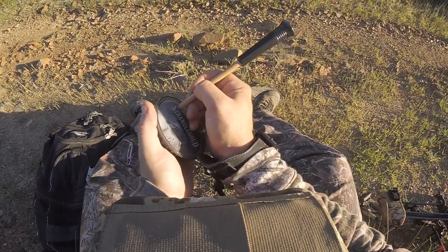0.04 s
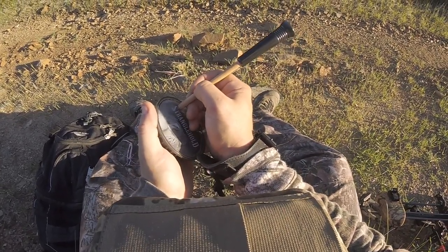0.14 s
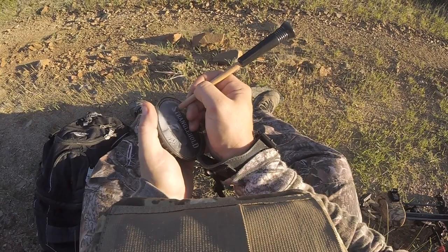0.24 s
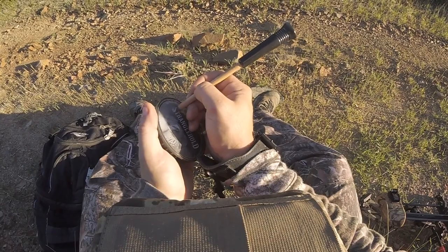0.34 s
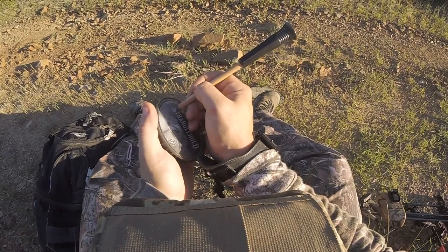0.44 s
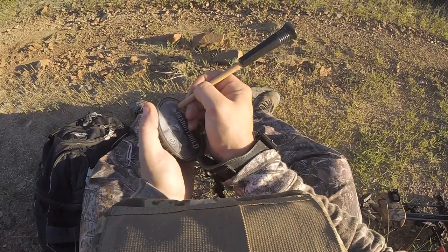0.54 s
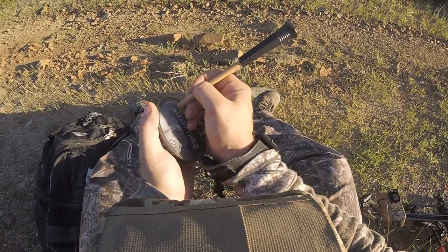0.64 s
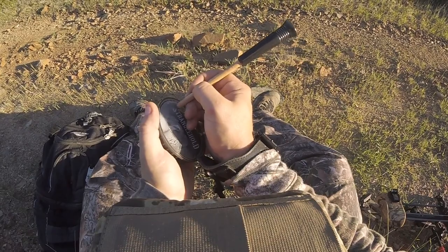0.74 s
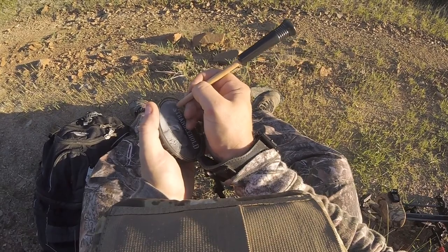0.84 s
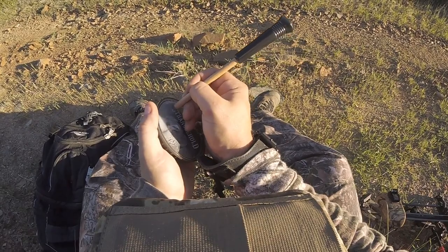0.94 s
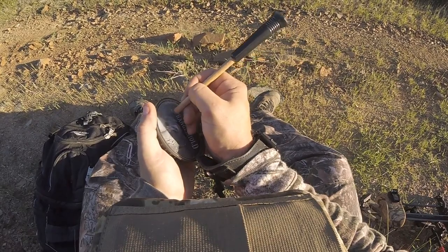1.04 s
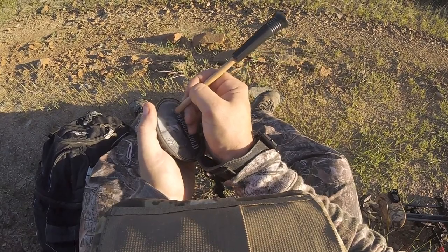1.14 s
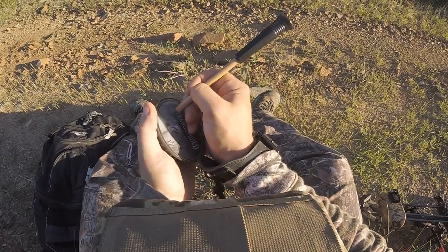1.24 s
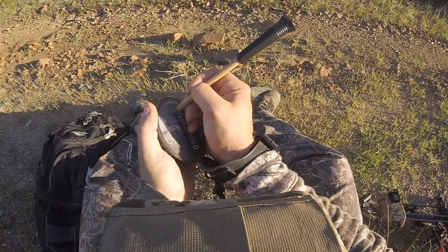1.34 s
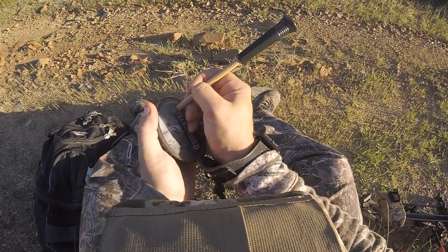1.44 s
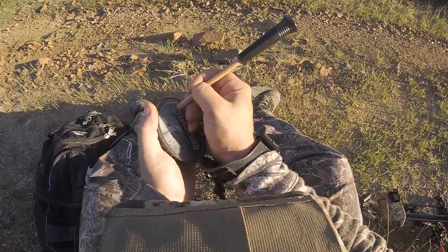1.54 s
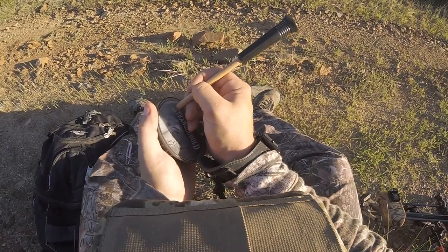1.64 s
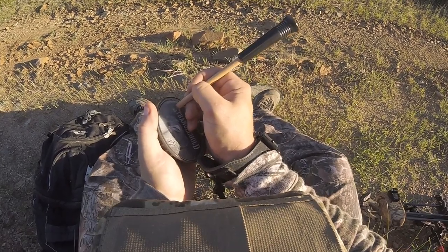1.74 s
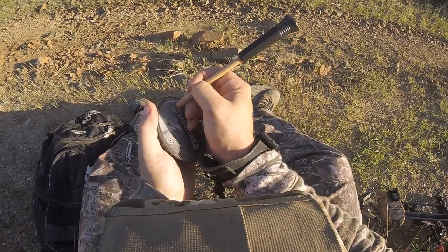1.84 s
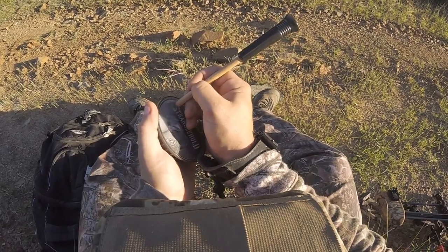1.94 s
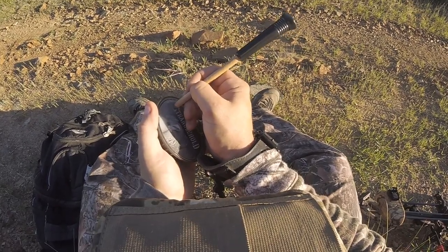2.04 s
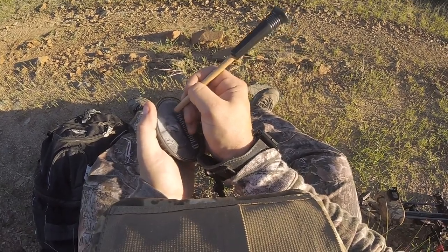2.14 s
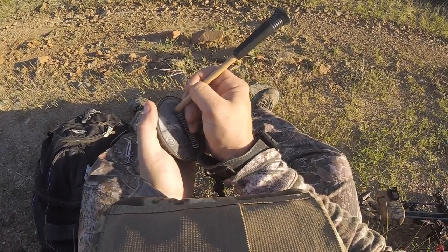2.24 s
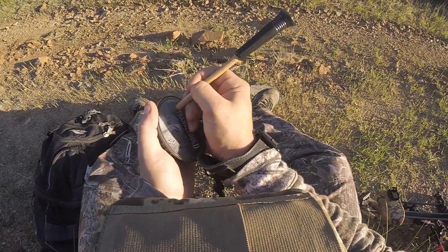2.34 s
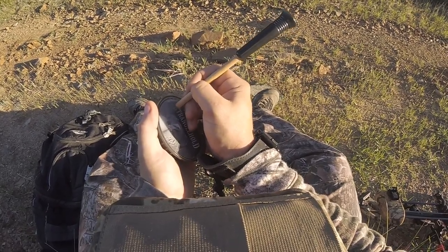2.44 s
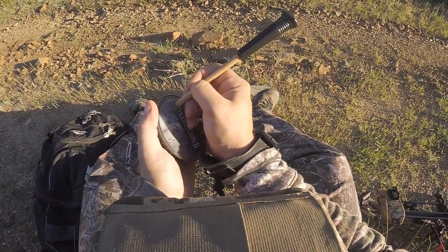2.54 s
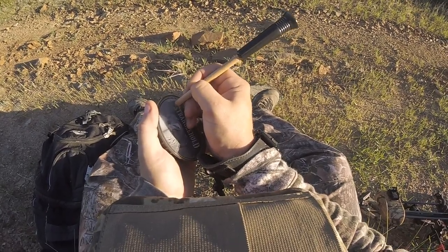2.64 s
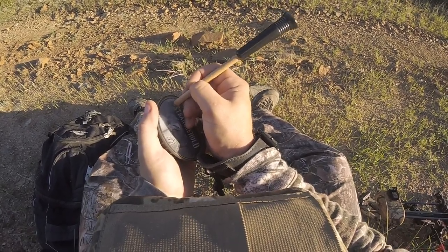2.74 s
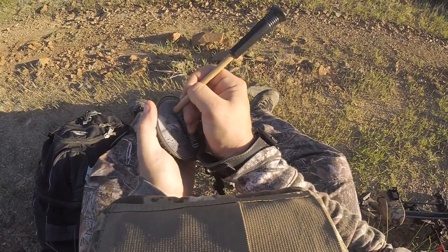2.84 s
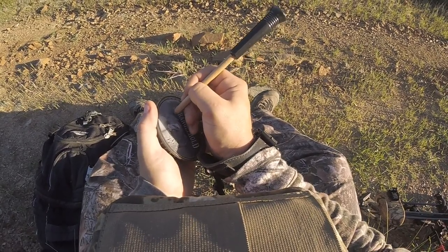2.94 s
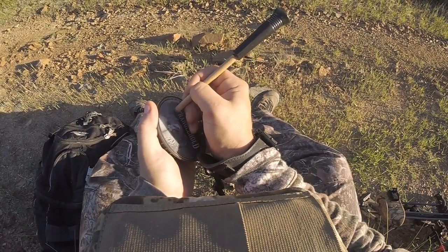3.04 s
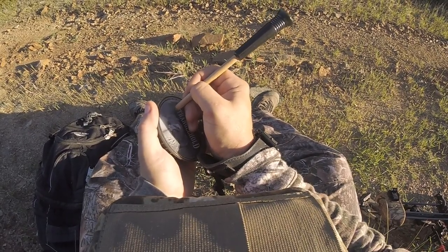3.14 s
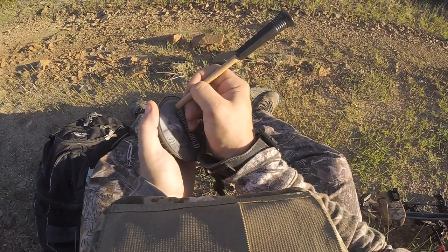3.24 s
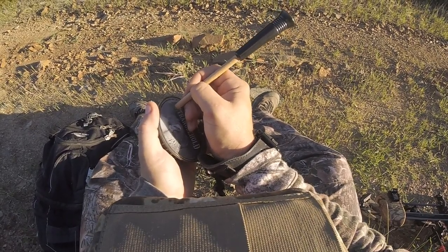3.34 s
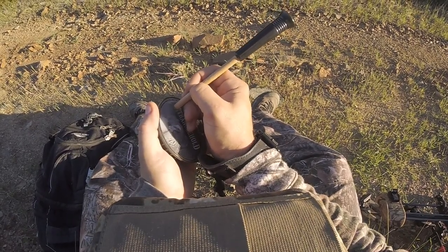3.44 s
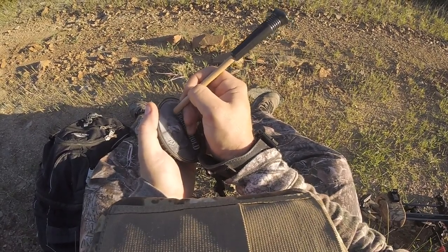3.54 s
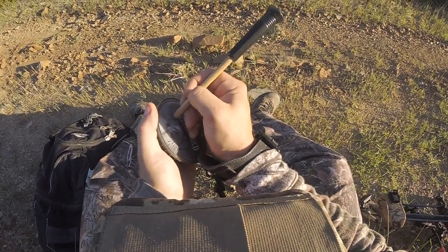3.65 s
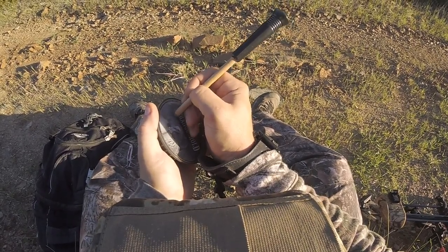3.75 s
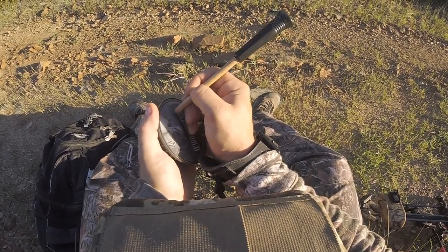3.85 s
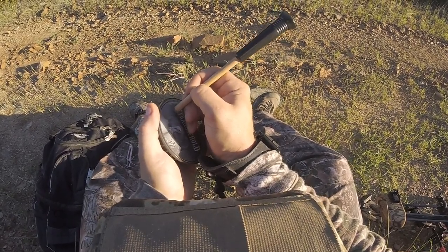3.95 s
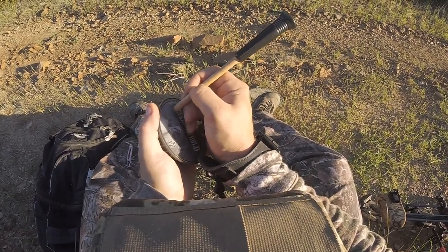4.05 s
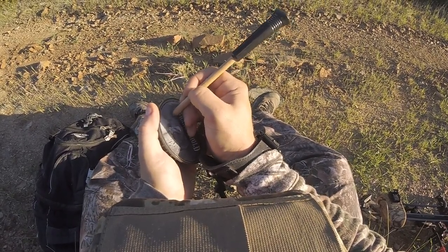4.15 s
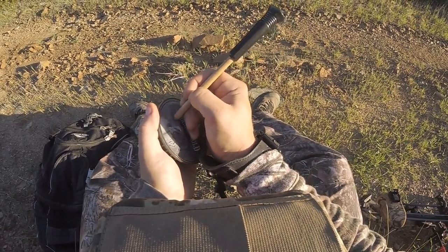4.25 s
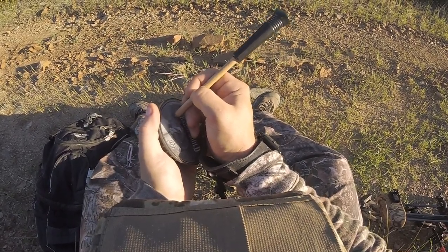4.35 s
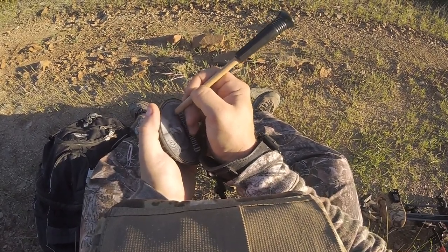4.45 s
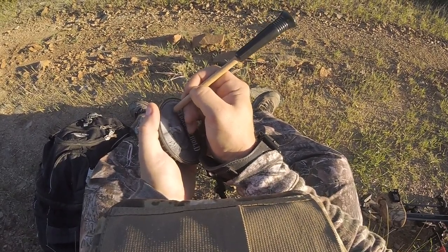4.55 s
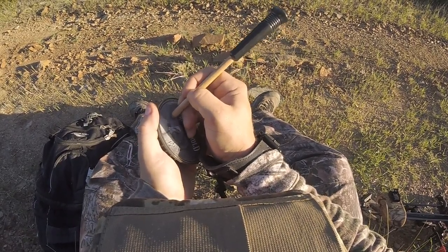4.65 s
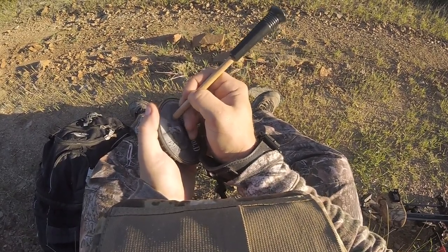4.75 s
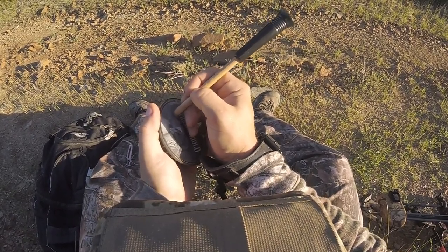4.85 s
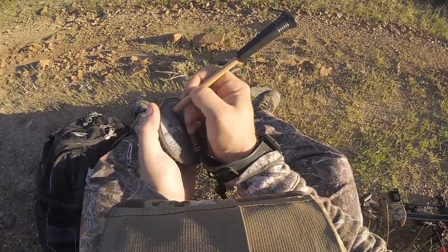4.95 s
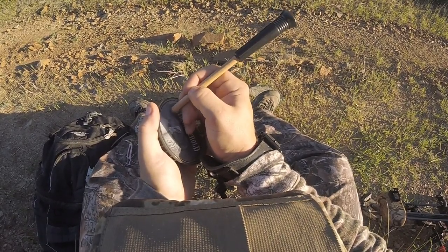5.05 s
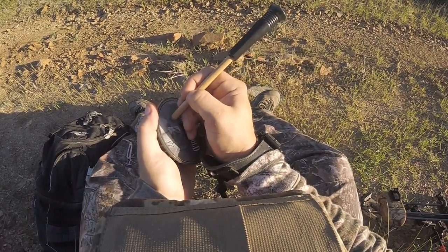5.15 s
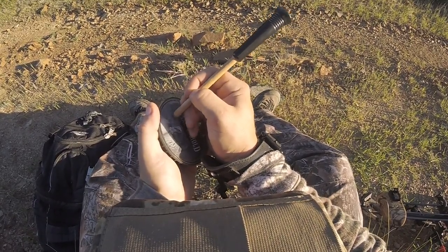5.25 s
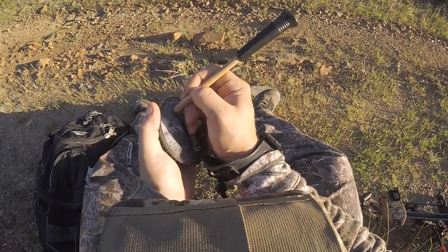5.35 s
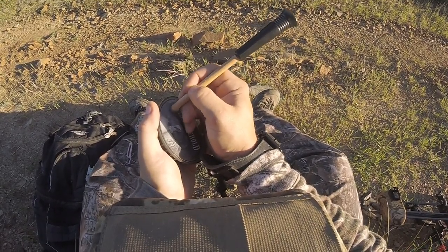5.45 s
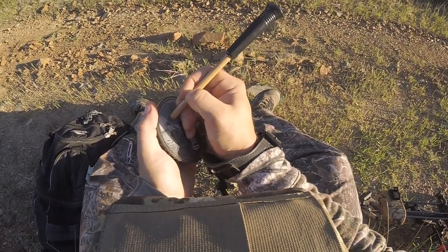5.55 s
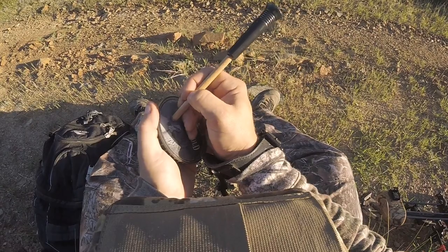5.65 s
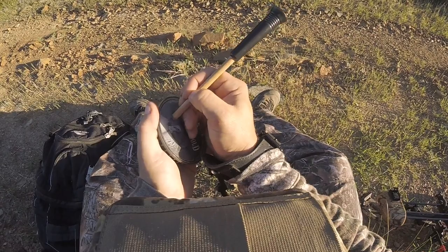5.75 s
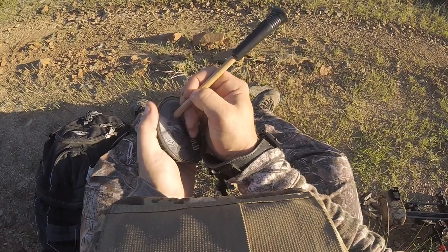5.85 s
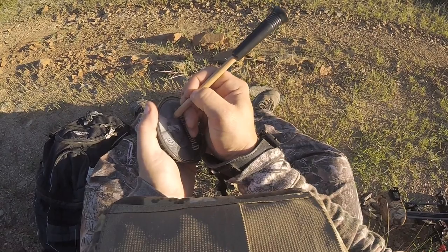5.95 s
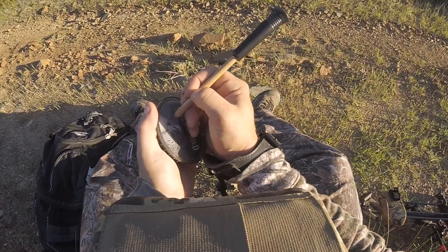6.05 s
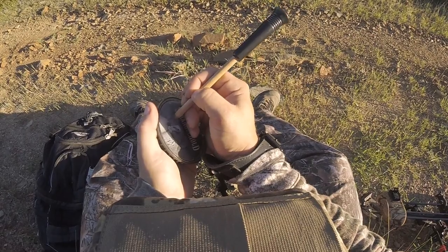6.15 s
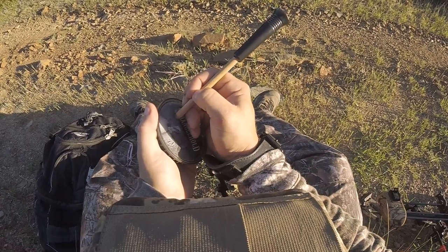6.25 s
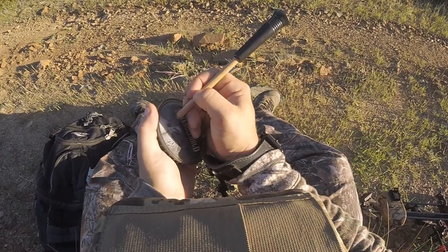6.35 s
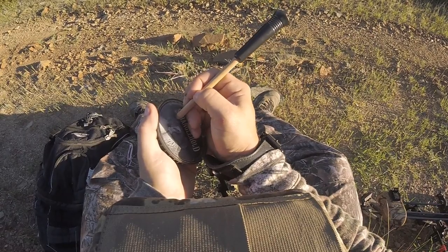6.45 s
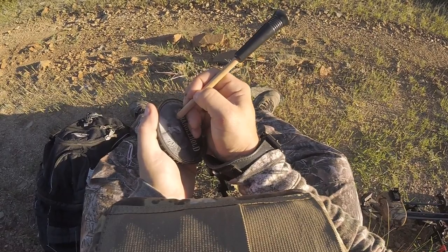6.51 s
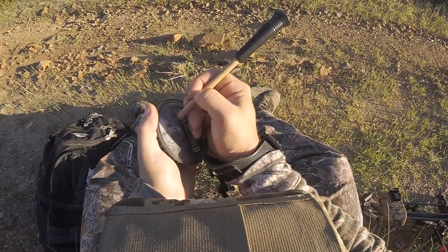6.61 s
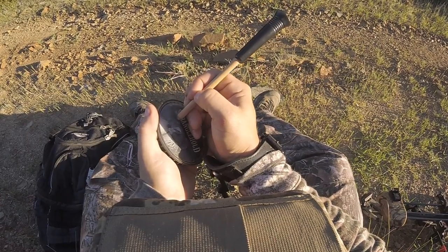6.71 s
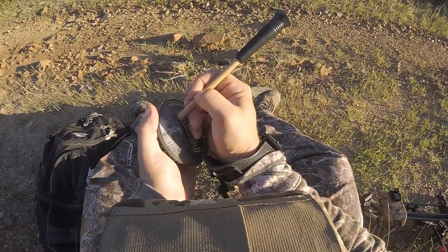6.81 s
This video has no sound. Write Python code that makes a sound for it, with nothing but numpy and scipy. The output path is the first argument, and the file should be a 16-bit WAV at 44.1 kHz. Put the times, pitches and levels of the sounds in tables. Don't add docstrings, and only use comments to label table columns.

```python
import sys
import numpy as np
from scipy import signal
from scipy.fft import rfft, irfft, next_fast_len
from scipy.io import wavfile
from scipy.ndimage import uniform_filter1d

SR = 44100
rng = np.random.default_rng(int(sys.argv[2]) if len(sys.argv) > 2 else 0)


def int16_out(signal):
    q = np.round(np.clip(np.atleast_2d(signal).T, -1, 1) * 32767)
    wavfile.write(sys.argv[1], SR, q.astype(np.int16))


def natural_amplitude(level_db):
    exponent = np.asarray(level_db, float) / 20
    return 10 ** exponent


N = 303408
DUCK_DEPTH_DB = 7

# bite_s, break_s, lift_s, bite_slip_hz, lift_slip_hz
YELPS = [
    (.899, .9815, 1.088, 950, 786),
    (2.0855, 2.0955, 2.204, 900, 840),
    (2.803, 2.804, 2.9, 845, 726),
    (3.508, 3.5315, 3.62, 922, 720),
    (4.1145, 4.125, 4.194, 903, 740),
    (4.629, 4.636, 4.7, 907, 804),
    (5.0875, 5.098, 5.154, 882, 720),
    (5.509, 5.51, 5.572, 845, 740),
]
# creep_before_bite_s, release_after_lift_s, lift_level_db, slide_after_lift_db
HAND = [(0.02, .016, -15, -54), (0.0062, 0.0063, -14, -56), (0.0072, .011, -14.5, -46),
        (.02, .015, -11.5, -40.5), (.012, .008, -15, -38), (.02, .008, -16.5, -40), (0.014, .01, -10, -40),
        (.008, 0.0116, -11.5, -36.5)]
# pitch_hz, width_hz, level_db
POT = [(1358.3, 200, 2.5), (1670, 267, 5), (1851, 130, -8)]
# pitch_hz, width_hz, level_db
OVERTONES = [(2508, 200, -23.5), (2658, 390, -31.5), (3000, 140, -39), (3570, 130, -29), (4120, 340, -44.5),
             (4700, 170, -44.5), (5155, 530, -29), (5840, 140, -29), (6360, 340, -42), (7480, 320, -52.5),
             (8340, 170, -38.5), (9150, 360, -50), (10264, 600, -54.5), (10700, 150, -50.5),
             (12380, 1200, -62)]


def resonance(x, hz, width_hz):
    r = np.exp(-np.pi * width_hz / SR)
    b = np.array([1, 0, -1]) * (1 - r * r) / 2
    a = [1, -2 * r * np.cos(2 * np.pi * hz / SR), r * r]
    return signal.lfilter(b, a, x + 1e-18)


def rms_one(x):
    return x / np.sqrt(np.mean(x ** 2))


def drift(rate_hz):
    r = np.exp(-2 * np.pi * rate_hz / SR)
    wander = signal.lfilter([1], [1, -2 * r, r * r], rng.standard_normal(N + SR))
    return rms_one(wander[SR:])


def gusts_db():
    # peak_s, swell_db
    gusts = [
        (.8, 11.5),
        (1.17, 12),
        (1.72, 11),
        (2.1, 7.5),
        (3.07, 4),
        (4.08, 2.5),
    ]
    wind_db, gust_s = -78.5, 0.1
    t = np.arange(N) / SR
    return wind_db + sum(swell_db * np.exp(-.5 * ((t - s) / gust_s) ** 2) for s, swell_db in gusts)


def air():
    # pitch_hz, density_db_per_hz
    air_spectrum = [(18, -57.5), (30, -30), (102, -40), (133, -3.5), (187, -1), (359, -11.5), (388, -11.5),
                    (1020, -19.5), (1680, -24.5), (2680, -29), (4080, -39), (5160, -42.5), (6700, -28.5),
                    (8930, -30), (15400, -45)]
    level_db, rise_db = -51.5, 1.03
    hz = np.maximum(np.arange(N // 2 + 1) * SR / N, 1)
    point_hz, point_db = np.transpose(air_spectrum)
    shape_db = np.interp(np.log(hz), np.log(point_hz), point_db)
    noise = rms_one(irfft(rfft(rng.standard_normal(N)) * natural_amplitude(shape_db), N))
    hum = rms_one(resonance(resonance(rng.standard_normal(N), 160, 20), 160, 20))
    hum = hum * natural_amplitude(-57.5 + 1.1 * drift(1.5))
    low_band = signal.butter(2, [18, 55], "band", fs=SR, output="sos")
    wind = rms_one(signal.sosfilt(low_band, rng.standard_normal(N)))
    noise_db = level_db + rise_db * np.linspace(-.5, .5, N) + 0.36 * drift(0.43)
    return natural_amplitude(noise_db) * noise + hum + wind * natural_amplitude(gusts_db() + 3.0 * drift(8))


def ringing(force, modes):
    return sum(natural_amplitude(level_db) * resonance(resonance(force, hz, width_hz), hz, width_hz)
               for hz, width_hz, level_db in modes)


def loud_band(x):
    return signal.sosfilt(signal.butter(4, [1200, 2110], "band", fs=SR, output="sos"), x)


def pot(force, rasp):
    return loud_band(ringing(force, POT)) + ringing(force + rasp, OVERTONES)


def taps():
    # at_s, peak_db, thump_db
    knock_table = [
        (0.164, -34.5, -58),
        (0.4619, -19.5, -47),
        (0.8165, -48, -47),
        (4.5875, -34.5, -61),
        (4.728, -22.5, -78),
        (4.9252, -34.5, -58),
        (5.3963, -50, -58),
        (5.447, -37, -26),
        (5.5914, -40, -46),
    ]
    knocks, thumps = np.zeros((2, N))
    for s, peak_db, thump_db in knock_table:
        knocks[round(s * SR)] = natural_amplitude(peak_db + 29.5)
        thumps[round(s * SR)] = natural_amplitude(thump_db + 27.5)
    tick = natural_amplitude(-37) * resonance(thumps, 6000, 7000)
    soft = signal.butter(1, 2500, fs=SR, output="sos")
    knocks, thumps = signal.sosfilt(soft, [knocks, thumps])
    thump = resonance(resonance(thumps, 260, 300), 280, 900)
    return tick + pot(knocks, 0) + 0.13 * loud_band(knocks) + thump


def sliding(t):
    # start_s, end_s, first_db, last_db
    slides = [(0.487, 0.523, -66, -64), (.58, 0.618, -67, -56), (0.67, 0.749, -58.5, -59.5),
              (1.117, 1.385, -54.5, -69), (1.42, 1.444, -64, -60), (1.471, 1.898, -73, -72),
              (1.901, 2.06, -70.5, -56), (2.231, 2.539, -53.5, -63), (2.546, 2.64, -67, -61.5),
              (2.662, 2.79, -68.5, -51.5), (2.964, 3.348, -56.5, -65.5), (3.411, 3.481, -61.5, -61.5),
              (3.741, 4.043, -49.5, -63), (4.296, 4.562, -53.5, -59), (4.807, 4.964, -51, -53),
              (4.98, 5.06, -58.5, -55), (5.26, 5.485, -53.5, -54), (5.604, 5.643, -55, -45.5),
              (5.67, 5.852, -59.5, -77.5)]
    # at_s, brightness_db
    drying = [
        (3.9, -1),
        (4.3, 3.5),
    ]
    settle_db_s, lean_db, lean_db_s = 286, -46, 496
    edge_s = .012
    power = np.zeros(N)
    for start_s, end_s, first_db, last_db in slides:
        edge = np.clip(np.minimum(t - start_s, end_s - t) / edge_s + 1, 0, 1)
        gain = natural_amplitude(np.interp(t, [start_s, end_s], [first_db, last_db]))
        power = np.maximum(power, (gain * edge) ** 2)
    back = power.copy()
    for (bite_s, _, lift_s, *_), (creep_s, release_s, _, after_db) in zip(YELPS, HAND):
        touch_s, free_s = bite_s - creep_s, lift_s + release_s
        lean = natural_amplitude(lean_db - lean_db_s * abs(touch_s - t))
        settle = natural_amplitude(after_db - settle_db_s * abs(t - free_s - .008))
        power += np.where(t < touch_s, lean, settle) ** 2
        power *= np.clip(np.maximum(touch_s - t, t - free_s + .004) / edge_s, 0, 1) ** 2
    bright_db = np.interp(t, *np.transpose(drying)) * np.minimum(back / (power + 1e-12), 1)
    return np.sqrt(power), natural_amplitude(bright_db)


def scrape():
    grains_per_s = 5000
    gain, bright = sliding(np.arange(N) / SR)
    grains = natural_amplitude(4.0 * np.minimum(rng.exponential(1, N), 5)) * rng.choice([-1, 1], N)
    grains = grains * (rng.random(N) < grains_per_s / SR)
    hiss = resonance(resonance(grains, 3000, 900), 3000, 900)
    high_whistle = natural_amplitude(2) * resonance(resonance(grains, 5250, 160), 5250, 160)
    low_whistle = natural_amplitude(4) * resonance(resonance(grains, 3560, 140), 3560, 140)
    tip = hiss + high_whistle + low_whistle
    treble = signal.sosfilt(signal.butter(2, 2200, "high", fs=SR, output="sos"), grains)
    sound = rms_one(natural_amplitude(-26) * bright * tip + pot(grains, 1.6 * bright * treble))
    return gain * natural_amplitude(2.5 * drift(30)) * sound


def notes():
    # at_s, top_hz, dip_hz, fall_db, hook_db
    trill = [(.6, 5600, 4800, -87, -71), (.8, 6050, 4620, -69, -62), (.9, 6050, 4620, -60, -55),
             (1.26, 6120, 4600, -59, -55), (1.34, 6150, 4420, -57, -59), (1.62, 5800, 4130, -54.5, -53),
             (1.78, 5600, 3820, -52.5, -56), (2.18, 5300, 3680, -57, -60), (2.35, 5250, 3620, -67, -68)]
    first_s, gap_s, tiring_s, hook_rise_hz = .6, .0715, .0019, 530
    k = np.arange(25)
    s = first_s + gap_s * k + tiring_s * np.maximum(k - 20, 0) ** 2
    at_s, *courses = np.transpose(trill)
    top_hz, dip_hz, fall_db, hook_db = [np.interp(s, at_s, course) for course in courses]
    chance = rng.standard_normal((len(k), 4)).T
    return zip(s, top_hz * (1 + .012 * chance[0]), dip_hz * (1 + .02 * chance[1]), dip_hz + hook_rise_hz,
               fall_db + 1.8 * chance[2], hook_db + 1.8 * chance[3])


def bird():
    # start_s, from_hz, to_hz, level_db
    chips = [
        (.522, 5060, 4700, -63),
        (6.18, 3430, 3300, -60.5),
        (6.55, 3470, 3300, -61),
    ]
    falters = [11, 12, 14, 15]
    falter_db = 18
    out = np.zeros(N)
    t = np.arange(round(.052 * SR)) / SR
    for k, (s, top_hz, dip_hz, hook_hz, fall_db, hook_db) in enumerate(notes()):
        gap_db = falter_db * (k in falters)
        hz = np.interp(t, [0, .004, .023, .034, .046], [top_hz, top_hz * .98, dip_hz, hook_hz, hook_hz * .94])
        level_db = np.interp(t, [0, .004, .013, .021, .030, .042, .052],
                             [fall_db - 14.0, fall_db - 0.5, fall_db - 3.5 - gap_db / 2,
                              hook_db - 9.5 - gap_db / 3, hook_db, hook_db - 0.5, hook_db - 31])
        out[round(s * SR):][:len(t)] += natural_amplitude(level_db) * np.sin(2 * np.pi * np.cumsum(hz) / SR)
    for s, from_hz, to_hz, level_db in chips:
        hz = np.linspace(from_hz, to_hz, 400)
        chip = np.hanning(len(hz)) * np.sin(2 * np.pi * np.cumsum(hz) / SR)
        out[round(s * SR):][:len(hz)] += natural_amplitude(level_db) * chip
    out = out + 2.5 * resonance(out, 5100, 200) + 2.5 * resonance(out, 5760, 200)
    lag_s = np.arange(round(.12 * SR)) / SR
    smear = rng.standard_normal(len(lag_s)) * natural_amplitude(-33 - 60 * lag_s / 0.24)
    return out + signal.fftconvolve(out, smear)[:N]


def stroke(bite_s, break_s, lift_s, bite_hz, lift_hz, creep_s, release_s, lift_db,
           ragged, alternate_s, alternate, late):
    # at_s, half_length_s, loss_db
    stumbles = [(0.9198, 0.0055, 8.5), (0.9835, .003, 3), (1.066, .006, 4.5), (1.0827, .005, 7),
                (2.094, 0.0053, 1.5), (4.188, 0.004, 16.5), (4.6739, .0025, 9), (4.6776, .0025, 6.5),
                (4.684, .005, 5.5), (5.548, .003, 4), (5.566, .003, 5.5)]
    # at_s, slips_lost_hz
    sag = [
        (2.812, 0),
        (2.838, 48),
        (2.853, 241),
        (2.862, 239),
        (2.873, 182),
        (2.879, 0),
    ]
    break_hz, lock_hz, creep_rise_hz, lift_rise_hz = 845, 670, 100, 95
    touch_db, bite_db, peak_db, broken_db, hold_db, gone_db = -44.5, -10, -7, -11.5, -9.5, -41
    broken_s = break_s + .0035
    recovered_s = broken_s + 0.015
    clean, locked_uneven, wear_power, chatter = .01, .022, 2.4, .45
    marks = [bite_s - creep_s, bite_s, break_s, broken_s, recovered_s, (break_s + lift_s) / 2 + .01,
             lift_s, lift_s + release_s]
    t = np.arange(marks[0], marks[-1], 1 / 2000)
    done = np.clip((t - broken_s) / (lift_s - broken_s), 0, 1)

    hz = np.interp(t, [bite_s - .009, *marks[1:4], *marks[6:]],
                   [bite_hz + creep_rise_hz, bite_hz, break_hz, lock_hz, lock_hz, lock_hz + lift_rise_hz])
    slowed = np.clip((t - bite_s) / (break_s - bite_s), 0, 1)
    hz = hz - (bite_hz - break_hz) * (slowed ** .85 - slowed)
    hz = hz + (lift_hz - lock_hz) * done ** late - np.interp(t, *np.transpose(sag))

    level_db = np.interp(t, marks, [touch_db, bite_db, peak_db, broken_db, hold_db, hold_db, lift_db, lift_db])
    level_db = level_db - (lift_db - gone_db) * np.clip((t - lift_s) / release_s, 0, 1) ** 1.5
    level_db = level_db - sum(loss_db * np.clip(1 - abs(t - s) / half_s, 0, 1)
                              for s, half_s, loss_db in stumbles)

    uneven = np.interp(t, marks[:4], [locked_uneven, clean, clean, locked_uneven])
    uneven = uneven + (ragged - locked_uneven) * done ** wear_power
    alternate = alternate * np.exp(-.5 * ((t - alternate_s) / .013) ** 2) * (t > break_s)
    return np.transpose([t, hz, level_db, uneven + chatter * alternate ** 2, alternate])


def yelp(rows, bite_db, slip_s, rasp):
    # pitch_hz, width_hz, level_db
    undertones = [(463, 79, -29), (642, 190, -35.5), (1015, 340, -34)]
    s, *columns = np.transpose(rows)
    t = np.arange(round((s[0] - .01) * SR), round((s[-1] + 0.0036) * SR)) / SR
    level_db = np.interp(t, s, columns[1])
    slip_hz, _, uneven, alternate = [np.interp(t + .0025, s, column) for column in columns]
    turns = np.cumsum(slip_hz) / SR
    cycle = turns.astype(int)
    late, strong = rng.standard_normal((400, 2))[cycle].T
    jitter = np.clip((.005 + .24 * uneven) * late, -.35, .35)
    gap_s = (turns - cycle - .5 - jitter) / slip_hz
    size = 1 + alternate * (-1.) ** cycle + .85 * uneven * strong
    pressure = natural_amplitude(np.minimum(level_db + 9, 0))
    push = size * np.exp(-.5 * (gap_s * pressure ** .15 / slip_s) ** 2)
    noise = rng.standard_normal(SR)[:len(t)] * (0.15 + uneven)
    rung = loud_band(ringing(push + .012 * noise, POT)) + ringing(push, undertones)
    overtones = ringing(push + rasp * pressure ** 0.22 * noise, OVERTONES)
    overtones = overtones * (670 / slip_hz) ** 1.5
    power = uniform_filter1d(uniform_filter1d(rung ** 2, size=130), size=130)
    loudness = np.sqrt(power + 1e-9)
    fade = np.clip(np.minimum(t - s[0] + 0.0032, s[-1] + 0.0033 - t) / .004, 0, 1)
    sound = rung / loudness + natural_amplitude(bite_db) * overtones / np.median(loudness)
    return round(t[0] * SR), sound * natural_amplitude(level_db) * fade


def scene():
    # lift_unevenness_0_1, alternation_peak_s, alternation_depth_0_1, speedup_lateness_power
    grip_table = [(.03, 1.02, .05, 2.0), (.02, 2.133, .22, 4.5), (.18, 2.825, .28, 3),
                  (.3, 3.615, .32, 3.5), (.24, 4.18, .6, 4), (.08, 4.677, .7, 4), (.25, 5.148, .3, 2.5),
                  (.3, 5.555, .35, 1.8)]
    bite_table = [0, 3, -1.3, 3.5, 3.5, 2.5, 2.9, 4]
    # delay_s, level_db
    echoes = [(0.023, -44.5), (.047, -45), (.083, -47.5), (0.129, -52)]
    call = natural_amplitude(5.0) * scrape() + taps()
    for times, hand, grip, bite_db in zip(YELPS, HAND, grip_table, bite_table):
        rows = stroke(*times, *hand[:3], *grip)
        at, sound = yelp(rows, bite_db, slip_s=2.6e-5, rasp=0.55)
        call[at:at + len(sound)] += natural_amplitude(DUCK_DEPTH_DB) * sound
    returns = sum(natural_amplitude(level_db) * np.roll(call, round(delay_s * SR)) for delay_s, level_db in echoes)
    return (call + loud_band(returns) + natural_amplitude(-1.0) * bird() + air())[None]


def low_pass(x):
    return signal.sosfilt(signal.butter(12, 15600, fs=SR, output="sos"), x)


def record(dry):
    duck_from_db, release_db_s = -25, 10
    t = np.arange(N) / SR
    level_db = 10 * np.log10(uniform_filter1d(dry[0] ** 2, size=300) + 1e-12)
    capped_db = np.minimum(level_db, duck_from_db + DUCK_DEPTH_DB + 0.52)
    held_db = np.maximum.accumulate(capped_db + release_db_s * t) - release_db_s * t
    duck_db = uniform_filter1d(np.clip(held_db - duck_from_db, 0, DUCK_DEPTH_DB), size=200)
    ducked = dry * natural_amplitude(-duck_db)
    reach = np.abs(signal.hilbert(ducked, next_fast_len(N))[:, :N])
    limited = ducked * uniform_filter1d(np.minimum(1, .66 / (reach + 1e-9)), size=40)
    return low_pass(limited)


dry = scene()
out = record(dry)
int16_out(out)
```